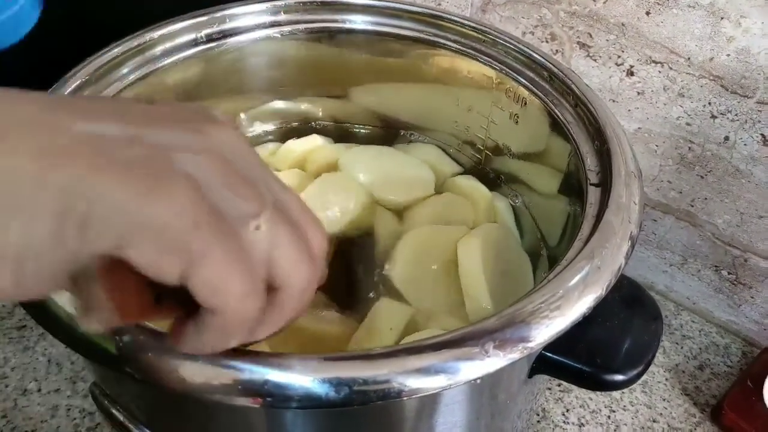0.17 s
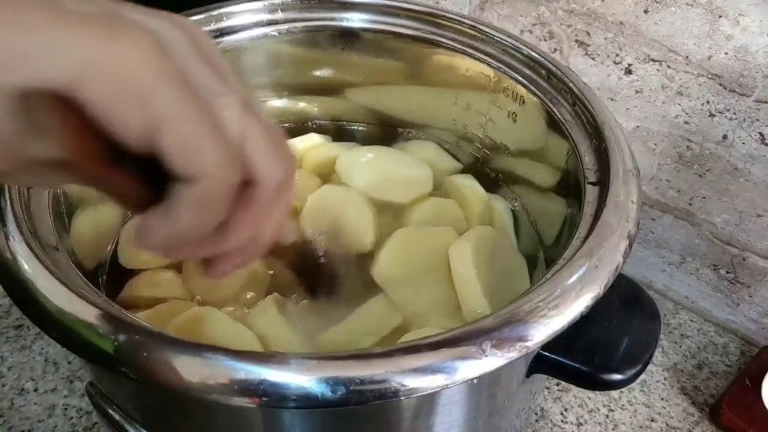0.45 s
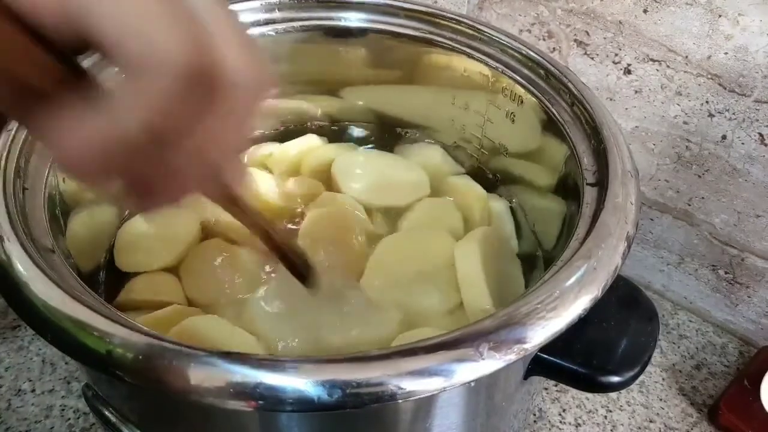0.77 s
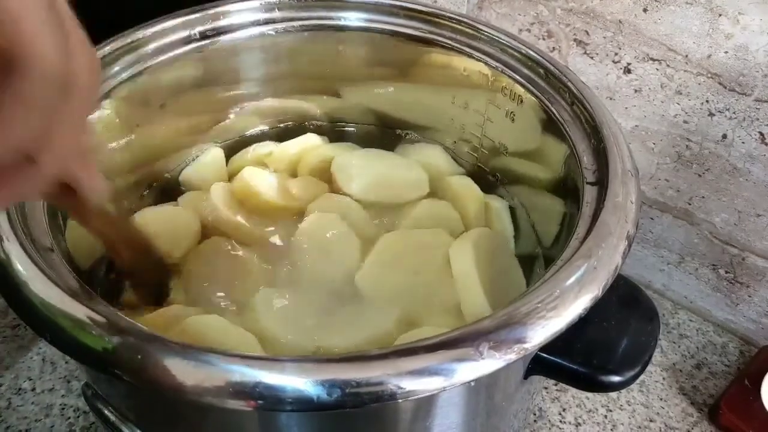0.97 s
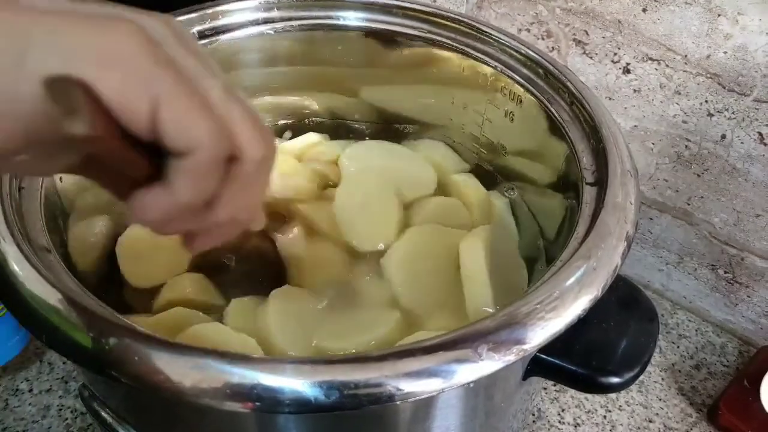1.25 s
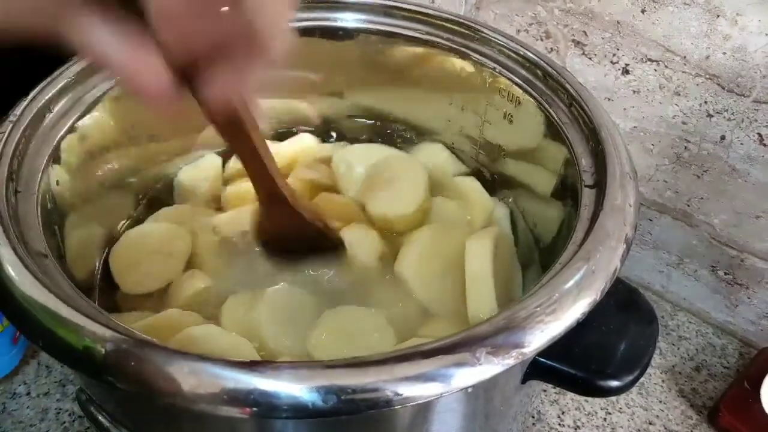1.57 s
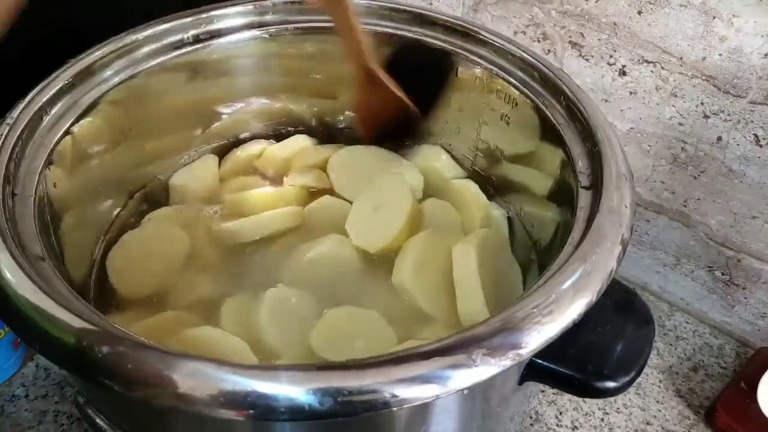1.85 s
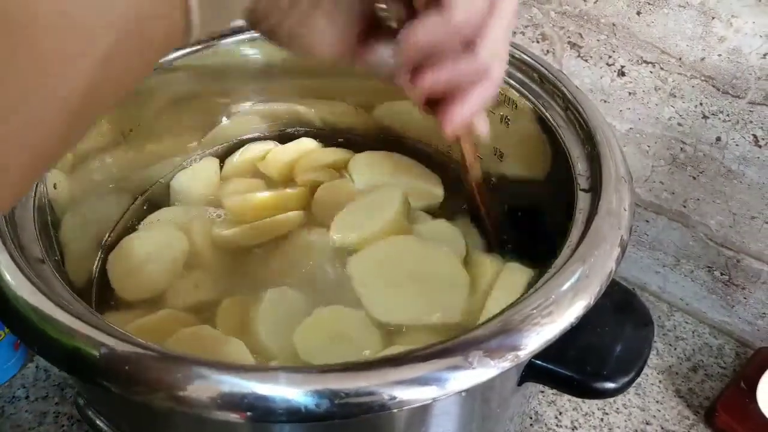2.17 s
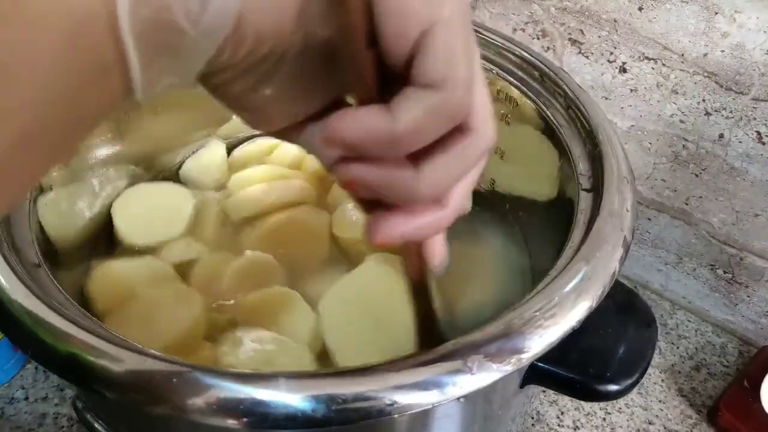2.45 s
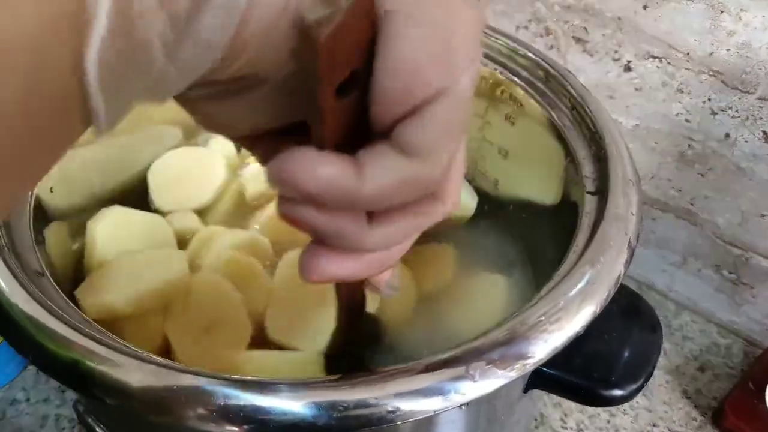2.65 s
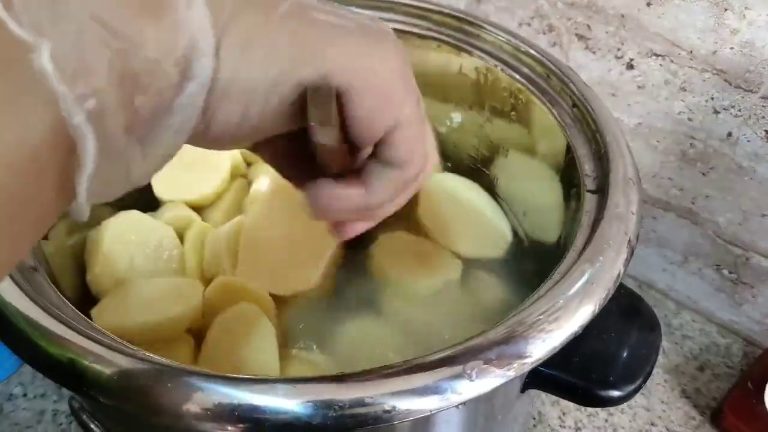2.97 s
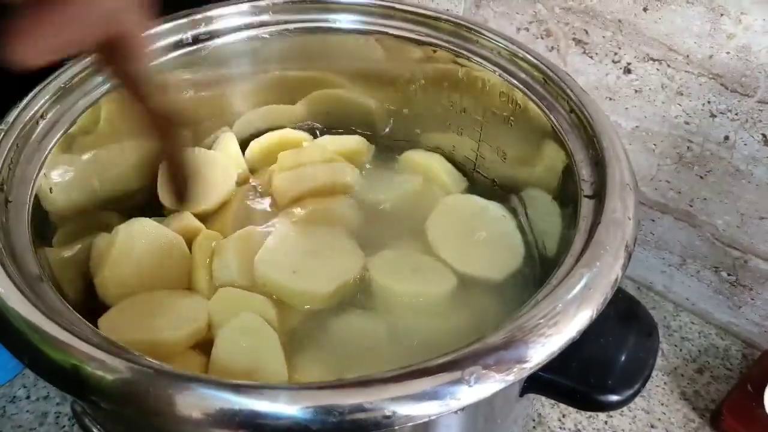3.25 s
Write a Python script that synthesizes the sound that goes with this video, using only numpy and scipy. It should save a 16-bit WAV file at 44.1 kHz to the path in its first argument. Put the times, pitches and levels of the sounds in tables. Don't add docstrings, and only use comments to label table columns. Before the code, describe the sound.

Wooden spoon knocks dully on a water-filled steel pot while stirring clicking, sloshing potato slices.

```python
import sys
import numpy as np
from scipy import signal
from scipy.io import wavfile
from scipy.ndimage import uniform_filter1d

SR = 44100
rng = np.random.default_rng(int(sys.argv[2]) if len(sys.argv) > 2 else 0)


def linear_from_db(decibels):
    return 10 ** (np.asarray(decibels, float) / 20)


def generate_wav(sig):
    pcm = np.round(np.clip(np.atleast_2d(sig).T, -1, 1) * 32767).astype(np.int16)
    wavfile.write(sys.argv[1], SR, pcm)


N = 149940

WIDE_HZ = 1060
LEFT_LAG_S = .00008
OPPOSITE = np.array([[1], [-1]])


def band(x, hz, width_hz):
    return signal.lfilter(*signal.iirpeak(min(hz, .45 * SR), hz / width_hz, fs=SR), x)


def band_twice(x, hz, width_hz):
    return band(band(x, hz, width_hz), hz, width_hz)


def unit(x):
    return x / np.sqrt(np.mean(x ** 2) + 1e-30)


def fade(t60, span=.5):
    return np.exp(-np.log(1000) * np.arange(int(span * SR)) / SR / max(t60, 1e-3))


def ring(hz, t60, glide=0., span=.5):
    t = np.arange(int(span * SR)) / SR
    return fade(t60, span) * np.sin(2 * np.pi * hz * t * (1 + glide * t / t60))


def add(out, s, sound):
    i = int(s * SR)
    out[..., i:i + sound.shape[-1]] += sound[..., :N - i]


def walk(rate):
    k = int(SR / rate)
    held = np.repeat(rng.standard_normal(N // k + 1), k)
    slewed = uniform_filter1d(uniform_filter1d(held, k), k)
    return 1.6 * np.tanh(slewed[:N])


def pair(hz):
    mid, side = rng.standard_normal((2, N))
    return mid + min(hz / WIDE_HZ, 1) * side * OPPOSITE


def knocks():
    # (time [s], level [dB], contact brightness [Hz], spread [octaves], rattle t60 [s])
    wall_hits = [(.2150, -25, 1020, 0.96, 0.066), (.2170, -30, 2100, 0.37, 0.27),
                 (.2250, -30, 1000, .9, 0.26), (0.64, -36, 2440, 0.11, 0.23), (.6640, -36, 2410, 0.12, .6),
                 (.6470, -32, 870, 0.75, 0.089), (.6600, -38.5, 280, 0.25, .1),
                 (.8870, -40, 1540, 0.26, 0.36), (1.1370, -39, 800, 1.2, .05),
                 (1.2981, -32, 580, 0.8, 0.088), (1.3064, -37.5, 436, .9, 0.24),
                 (1.3564, -32.5, 1560, 0.42, 0.43), (2.026, -43, 350, 0.91, 0.18),
                 (2.2720, -44, 1020, 0.28, 0.11), (2.5300, -40, 1300, 0.51, 0.022),
                 (2.5539, -33.5, 790, 0.97, 0.08), (2.5680, -41, 1050, 0.42, 0.18),
                 (2.6319, -39.5, 2270, 0.4, 0.31), (2.6760, -48, 1100, 0.26, .03),
                 (2.8766, -41.5, 920, 0.83, 0.13), (2.8990, -40.5, 1050, 0.65, .05),
                 (1.1020, -37.5, 330, 0.77, 0.16), (2.3300, -46.5, 330, 0.77, 0.11)]
    # (frequency [Hz], level [dB], t60 [s])
    wall_modes = [(271, -11, 0.43), (325, 1, 0.11), (455.5, 1.5, 0.071), (654.5, -1.5, 0.1),
                  (851, -2.5, 0.1), (1050, 2, 0.062), (1340, -15.5, 0.02), (1530, -1.5, 0.035),
                  (1981, -4.5, 0.085), (2123, -8, 0.11), (2224, -13, 0.11), (2423, -7.5, 0.075),
                  (2680, -13.5, 0.06), (3300, -19.5, .05)]
    first_blow, bounce_size, bounces_per_s = 2.5, .4, 1800
    detune = .012
    clack_db, clack_t60_s = -8.5, 0.08
    out = np.zeros((2, N))
    for s, db, bright_hz, spread, rattle_t60 in wall_hits:
        size, chance = rng.standard_normal(SR // 2), rng.random(SR // 2)
        drive = bounce_size * size * fade(rattle_t60) * (chance < bounces_per_s / SR)
        drive[0] += first_blow
        body = np.zeros((2, SR // 2))
        for hz, mode_db, t60 in wall_modes:
            scatter = rng.standard_normal(3)
            off_octaves = np.log2(hz / bright_hz) / spread
            gain = linear_from_db(mode_db - 6.6 * off_octaves ** 2 + 1.1 * scatter[:2, None])
            phase = np.sign(np.cos(hz / 420)) if hz > WIDE_HZ else 1
            mode = ring(hz * (1 + detune * np.tanh(scatter[2])), t60)
            body += gain * mode * np.array([[1], [phase]])
        hit = signal.fftconvolve(body, drive[None])
        add(out, s, linear_from_db(db) * hit / np.abs(hit).max())
        clack = unit(band_twice(rng.standard_normal((2, SR // 2)), bright_hz, bright_hz * spread))
        add(out, s, linear_from_db(db + clack_db) * clack * fade(clack_t60_s + .5 * rattle_t60))
    return out


def thumps():
    # (time [s], level [dB], base pitch [Hz], worktop share [dB])
    pushes = [(0.194, -31.5, 128, 4), (0.229, -32, 255, -4.5), (0.338, -39, 202, -5),
              (0.601, -36, 224, 2.5), (0.721, -37.5, 230, 5), (1.1, -24.5, 214, -2.5),
              (1.141, -28, 179, 6.5), (1.298, -28, 233, -1), (1.47, -57, 151, -8), (1.663, -46.5, 156, 7.5),
              (2.021, -30.5, 225, -2), (2.076, -38, 170, -9), (2.152, -42.5, 290, 7.5),
              (2.29, -27, 181, -2.5), (2.335, -40.5, 200, -9), (2.36, -35, 166, -16), (2.387, -35, 137, 5),
              (2.554, -32.5, 246, -6), (2.739, -32, 137, -4), (2.874, -34.5, 213, 4),
              (3.057, -37.5, 151, 9.5), (3.158, -34, 163, -11)]
    # (frequency [Hz], level [dB], t60 [s])
    worktop_modes = [(67, -16.5, 0.65), (88.4, -5, 0.35)]
    base_t60_s, base_db = 0.069, -5.5
    out = np.zeros(N)
    worktop = sum(linear_from_db(mode_db) * ring(hz, t60) for hz, mode_db, t60 in worktop_modes)
    worktop = worktop * (1 - fade(0.06))
    for s, db, hz, worktop_db in pushes:
        base = linear_from_db(base_db) * ring(hz, base_t60_s)
        add(out, s, linear_from_db(db) * (base + linear_from_db(worktop_db) * worktop))
    return out


def clicks():
    # (time [s], level [dB], pitch [Hz], ring t60 [s])
    snaps = [(0.6452, -21.5, 3920, 0.0058), (.6459, -25.5, 5260, 0.0089), (0.6455, -26, 2930, 0.0074),
             (0.7231, -24, 3430, 0.016), (0.721, -32, 4420, 0.026), (.746, -44, 3640, 0.015),
             (.7900, -40.5, 3450, 0.018), (.8060, -42, 3830, .02), (0.8858, -31.5, 1490, 0.012),
             (0.8869, -23.5, 3900, 0.0076), (0.9135, -33, 5060, 0.011), (1.0900, -50, 4570, 0.011),
             (1.1, -41.5, 1460, 0.013), (1.1330, -34, 7000, 0.015), (1.255, -34, 5500, 0.009),
             (1.2984, -34, 3400, 0.008), (1.2986, -30, 6100, 0.0065), (1.3020, -34.5, 2500, .015),
             (1.3193, -34, 4640, 0.037), (1.3522, -21, 3670, 0.011), (1.3521, -25.5, 3000, 0.004),
             (1.355, -27, 4340, 0.013), (1.3546, -24, 1590, 0.01), (1.4732, -40, 3370, 0.023),
             (1.4750, -48, 5500, .02), (1.6220, -39.5, 4730, 0.0074), (2.0203, -33, 7900, 0.008),
             (2.0219, -42.5, 9800, .005), (2.0215, -46.5, 3340, 0.012), (2.2, -42, 3780, 0.02),
             (2.2706, -45, 2870, 0.015), (2.2928, -45.5, 3780, 0.017), (2.4648, -40.5, 3750, .015),
             (2.4868, -34, 3480, 0.0069), (2.487, -33.5, 4460, 0.0041), (2.5303, -29.5, 3390, 0.0078),
             (2.5296, -34, 4520, 0.012), (2.5310, -37, 1360, .012), (2.5540, -48, 1140, .010),
             (2.6328, -37, 2000, .018), (2.6544, -33.5, 4640, 0.0047), (2.705, -39, 3300, 0.0066),
             (2.8760, -33.5, 4100, 0.012), (2.89, -31.5, 4200, 0.0074), (2.9505, -36.5, 3750, .008),
             (3.0410, -29, 3730, 0.015), (3.0460, -32, 4800, .01), (3.052, -38, 4850, 0.026),
             (3.0530, -35, 3300, 0.0091), (3.083, -39, 4030, .015)]
    glide, span = .08, .1
    hard_t60_s, crack_db, crack_t60_s = .007, -2, .010
    splash_t60_s, splash_db = .08, -19
    out = np.zeros((2, N))
    for s, db, hz, t60 in snaps:
        tone = ring(hz, t60, glide, span) * (1 - fade(t60 / 8, span))
        add(out[0], s + LEFT_LAG_S, linear_from_db(db + 2.3) * tone)
        add(out[1], s, linear_from_db(db - 1.1) * tone)
        noise = band(band(rng.standard_normal((2, SR // 10)), 4350, 6200), 3900, 10000)
        crack = linear_from_db(crack_db) * min(hard_t60_s / t60, 1) ** 2 * fade(crack_t60_s, span)
        splash = linear_from_db(splash_db) * fade(splash_t60_s, span)
        add(out, s, linear_from_db(db) * noise * (crack + splash))
    return out


def bubble_fizz():
    fizz_db, bubbles_per_s, flicker_db = -3, 1300, 2.5
    fizz = np.zeros((2, N))
    for s, octave, size, side in rng.random((int(bubbles_per_s * N / SR), 4)):
        hz = 2200 * 2 ** (1.677 * octave)
        bubble = ring(hz, 16 / hz, 0.048, span=.008) * (1 - fade(0.00049, .008))
        level = linear_from_db(-2.6 * np.log(1 - .97 * size))
        add(fizz, s * N / SR, level * bubble * np.array([[1], [2 * side - 1]]))
    hiss = rng.standard_normal((2, N)) * linear_from_db(flicker_db * walk(70))
    return linear_from_db(fizz_db) * unit(fizz) + hiss


def strokes():
    # (start [s], length [s], level [dB], centre [Hz])
    drags = [(-.05, 0.11, -57.5, 6700), (0.058, 0.24, -52.5, 6300), (0.19, 0.027, -51.5, 3540),
             (0.337, 0.022, -49.5, 5180), (0.477, 0.013, -53.5, 3890), (0.558, 0.027, -51, 6100),
             (0.62, 0.17, -52, 3700), (0.885, 0.019, -54.5, 4060), (1.098, 0.0094, -58.5, 3280),
             (1.11, 0.015, -50.5, 7000), (1.163, 0.051, -56.5, 3830), (1.291, 0.036, -47.5, 3940),
             (1.359, 0.042, -52.5, 2800), (1.378, .01, -51, 8000), (1.406, .005, -65, 7000),
             (1.462, 0.024, -49, 4040), (2.003, 0.04, -57.5, 3530), (2.087, 0.13, -64.5, 3600),
             (2.253, 0.055, -56, 3500), (2.402, 0.2, -58, 3540), (2.643, 0.0096, -52.5, 4950),
             (2.676, 0.01, -57.5, 4660), (2.699, 0.011, -53.5, 4170), (2.861, 0.053, -48.5, 4300),
             (2.947, 0.028, -52, 3480), (3, 0.046, -58.5, 3800), (3.04, 0.066, -51, 3500),
             (3.165, 0.026, -66, 4000)]
    rise_share, release_s = 0.31, .04
    out = np.zeros((2, N))
    t = np.arange(N) / SR
    fizz = bubble_fizz()
    for s, length, db, hz in drags:
        rise = np.clip((t - s) / (rise_share * length), 0, 1)
        release = np.exp(-np.clip(t - s - length, 0, 9) / release_s)
        out += linear_from_db(db) * rise * release * unit(band(fizz, hz, 1.53 * hz))
    return out


def bubbles():
    # (time [s], level [dB], pitch [Hz], ring t60 [s], rise [share of pitch])
    pops = [(.818, -45.5, 3370, 0.032, 0.0088), (.868, -48, 3750, 0.015, 0.013),
            (.904, -43, 3500, 0.032, 0.018), (.941, -40.5, 4000, .025, .1),
            (1.044, -48.5, 4670, 0.022, 0.01), (1.510, -44, 1830, 0.044, 0.01),
            (1.516, -43, 3400, 0.061, 0.012), (2.298, -43.5, 1020, 0.13, 0.01),
            (2.968, -44, 2730, .025, .03), (3.010, -43, 4280, .025, 0.01), (3.291, -44, 3676, 0.032, 0.011),
            (3.300, -43.5, 4580, 0.032, .25), (3.326, -49.5, 5250, .025, 0.16)]
    out = np.zeros(N)
    for s, db, hz, t60, rise in pops:
        swell = 1 - fade(0.48 * t60, .2)
        add(out, s, linear_from_db(db + 3) * ring(hz, t60, rise, .2) * swell)
    return np.array([out, np.roll(out, -int(LEFT_LAG_S * SR))])


def water():
    # (time [s], level [dB])
    effort_curve = [(0, -66), (.18, -57), (.35, -51), (0.551, -55.5), (.7, -49), (1.05, -63), (1.15, -56.5),
                    (1.35, -49), (1.6, -56), (1.95, -73), (2.07, -57), (2.32, -54.5), (2.6, -52.5),
                    (2.8, -53.5), (3.052, -49), (3.4, -60.5)]
    slosh_hz, slosh_db, rumble_db = 425, -3.5, 2.5
    t, db = np.array(effort_curve).T
    effort = linear_from_db(np.interp(np.arange(N) / SR, t, db))
    slosh = linear_from_db(slosh_db + 2.2 * walk(29.93)) * unit(band(pair(slosh_hz), slosh_hz, 780))
    low = band_twice(pair(80), 73.7, 35)
    upper = 0.36 * band(pair(155), 145, 36)
    rumble = linear_from_db(rumble_db + 2 * walk(7.73)) * unit(low + upper)
    return effort * (slosh + rumble)


def kitchen():
    # (frequency [Hz], level per Hz [dB])
    air_spectrum = [(30, -6.5), (70, -5.5), (160, -9), (400, -19.5), (1200, -23), (3000, -35), (7000, -43),
                    (16000, -43)]
    air_db, hum_hz, hum_width_hz, hum_db = -53, 89, 6, -55.5
    hz_at, db_at = np.array(air_spectrum).T
    air = np.zeros((2, N))
    for hz in 30 * 2 ** np.arange(0, 9.3, .5):
        db = np.interp(np.log(hz), np.log(hz_at), db_at) + 1.0 * walk(7)
        air += linear_from_db(db) * band_twice(pair(hz), hz, hz / 2)
    hum = unit(band_twice(rng.standard_normal(N), hum_hz, hum_width_hz))
    return linear_from_db(air_db) * unit(air) + linear_from_db(hum_db) * hum


def echo(pot):
    t60_s, echo_db = .2, -12
    tail = band(rng.standard_normal((2, SR // 2)), 1480, 6200) * fade(t60_s)
    tail = tail / np.sqrt((tail ** 2).sum(axis=1, keepdims=True))
    return signal.fftconvolve(pot, linear_from_db(echo_db) * tail, axes=1)[:, :N]


def scene():
    pan_db = 2.5
    pot = knocks() + clicks() + strokes() + bubbles()
    bed = thumps() + water() + kitchen()
    return (pot + echo(pot) + bed) * linear_from_db(pan_db * OPPOSITE / 2)


def top_cut(x):
    return signal.sosfilt(signal.butter(12, 16480, fs=SR, output="sos"), x)


def record(dry):
    drop_s, back_s = .3555, .4946
    t = np.arange(N) / SR
    x = signal.sosfilt(signal.butter(2, 62, "high", fs=SR, output="sos"), dry)
    x = signal.sosfilt(signal.butter(1, 9000, fs=SR, output="sos"), x)
    x = x * ((t < drop_s) | (t > back_s))
    mix = signal.sosfilt(signal.ellip(8, .2, 70, 15900, fs=SR, output="sos"), x)
    return top_cut(mix)


dry = scene()
out = record(dry)
generate_wav(out)
```